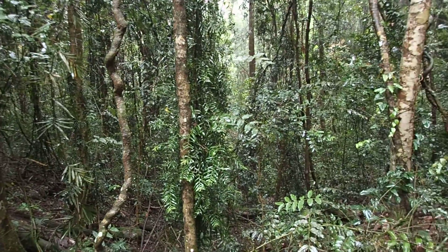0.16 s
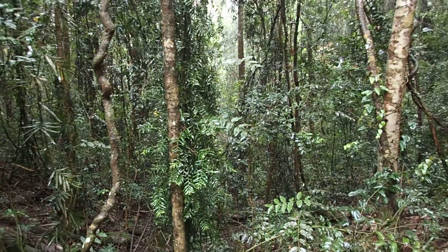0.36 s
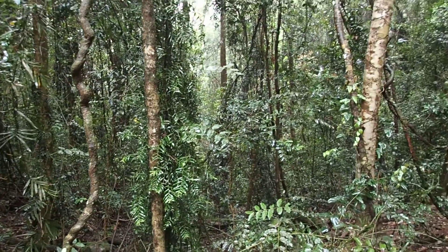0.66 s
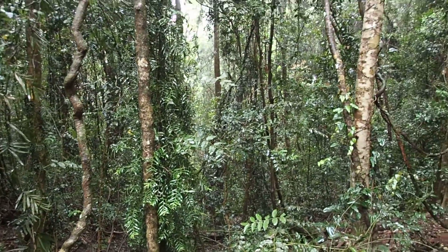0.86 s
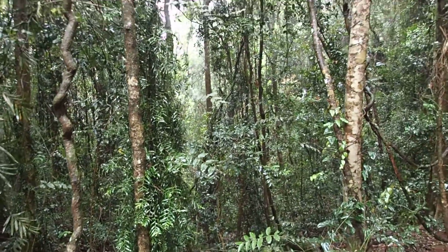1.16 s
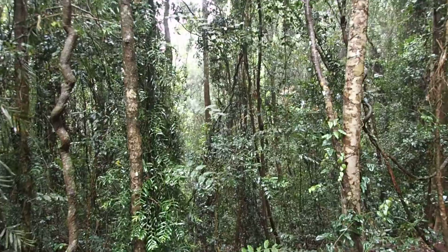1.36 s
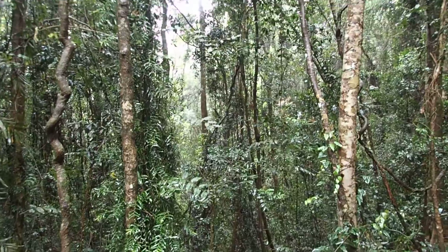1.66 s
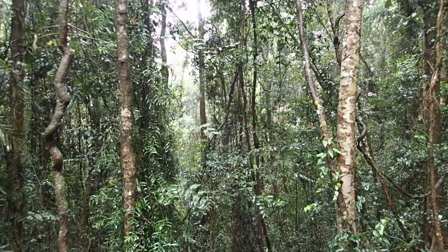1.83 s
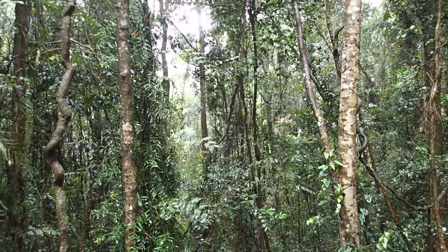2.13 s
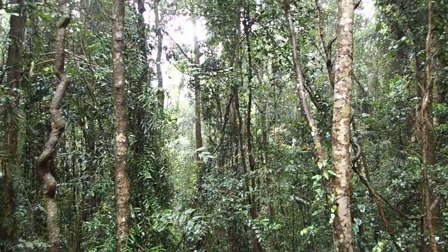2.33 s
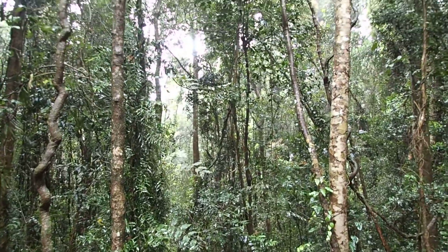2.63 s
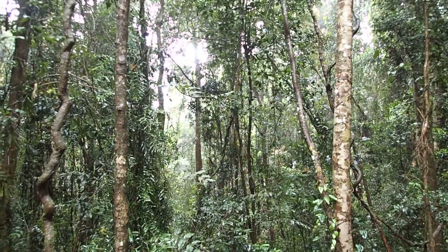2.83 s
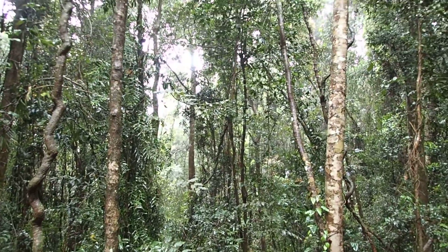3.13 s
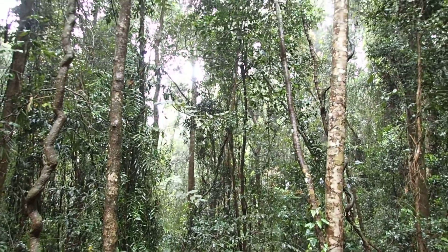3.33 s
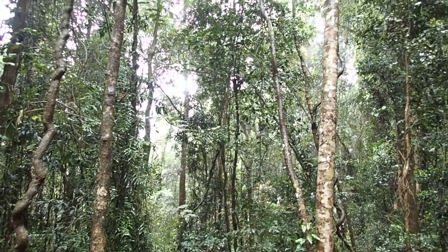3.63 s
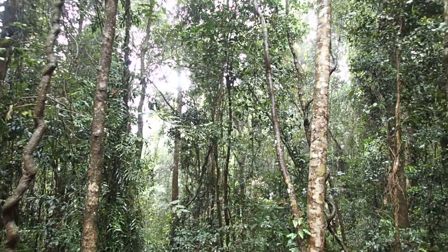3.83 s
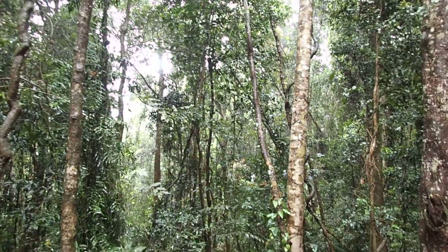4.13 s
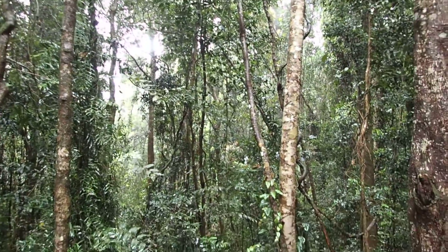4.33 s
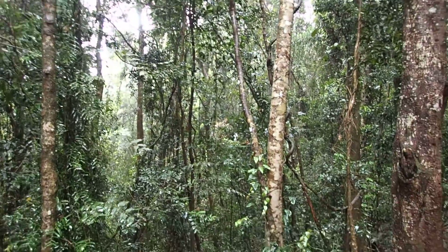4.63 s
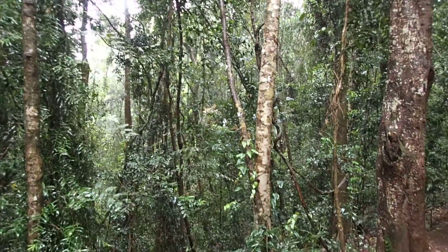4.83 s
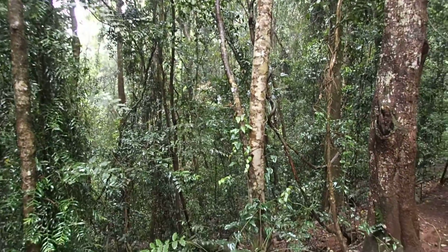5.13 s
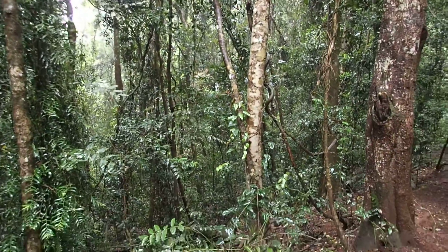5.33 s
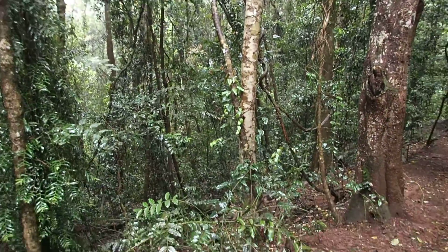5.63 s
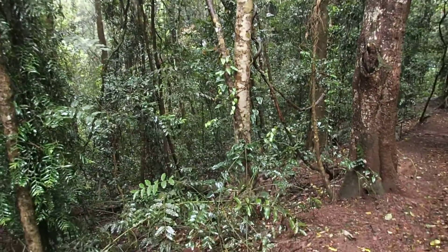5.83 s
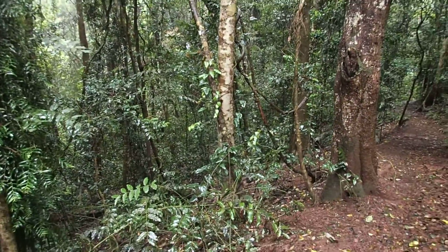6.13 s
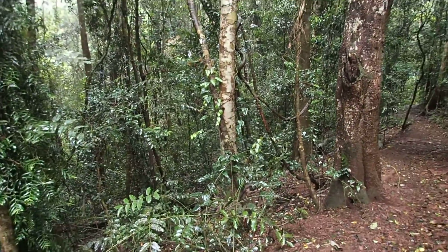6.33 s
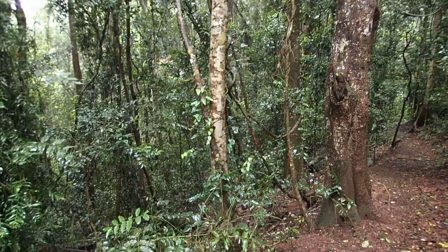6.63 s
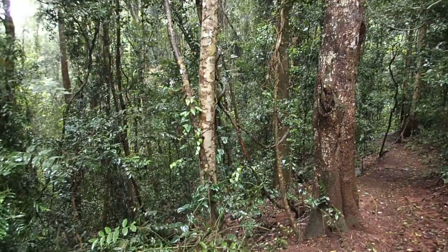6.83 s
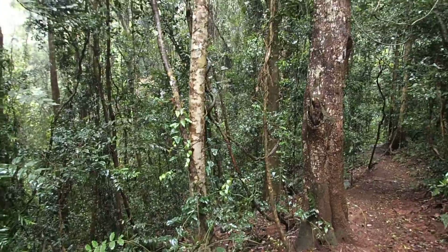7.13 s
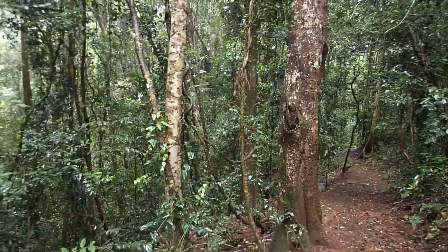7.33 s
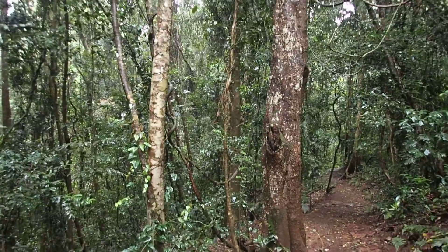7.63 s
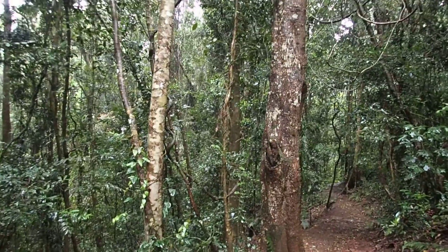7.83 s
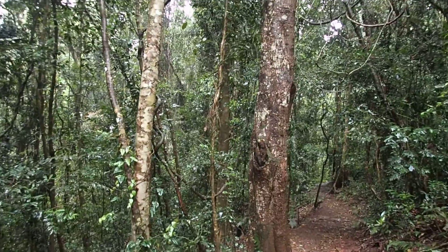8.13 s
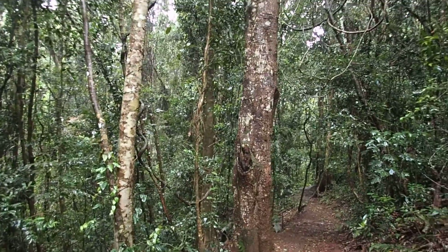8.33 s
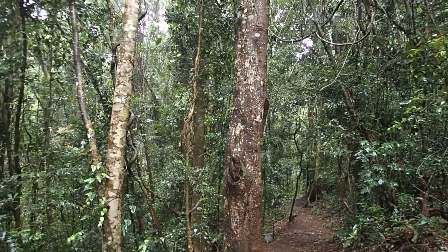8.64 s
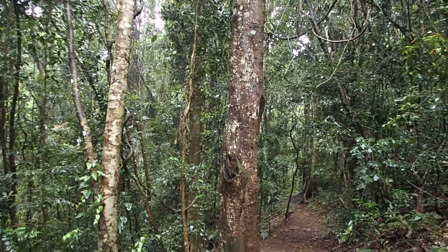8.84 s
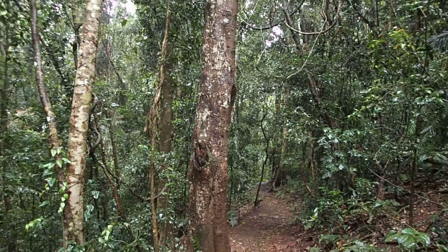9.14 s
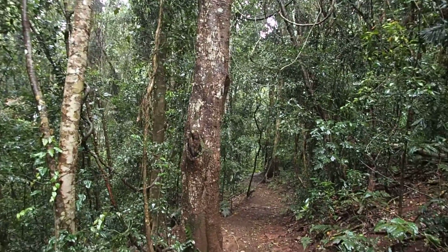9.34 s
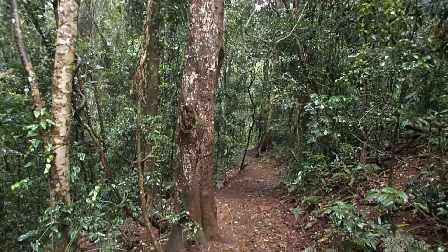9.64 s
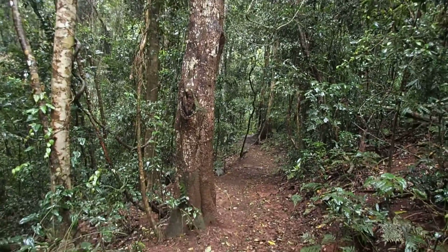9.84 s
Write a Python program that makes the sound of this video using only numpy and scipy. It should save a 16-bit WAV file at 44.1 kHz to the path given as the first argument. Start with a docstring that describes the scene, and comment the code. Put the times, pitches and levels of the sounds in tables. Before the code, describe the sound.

A damp rainforest with steady low rumble, airy hiss and irregular water drops pattering on foliage. A whipbird pipes a quick run of clear whistles, dips, and snaps into a rapid rising whip-crack with a ringing tail. Another bird's shrill, repeating rise-and-fall overlaps it and continues for several seconds, smeared by echoes. After quieter dripping, the whipbird calls once more. The small stereo microphone gives a slightly bright, resonant colour.

```python
"""Wet rainforest: throughout, forest noise hisses, drips burst on leaves, and a microphone colours it all.
From 2.5 s a whipbird gives short notes, rising then level, a falling note and a whip-crack sweep: bent sines.
From 3 s a small bird repeats a high two-note phrase that echoes off the trunks smear into a drone.
Near 5.2 s a faint chirp rises far off; from 7.8 s the whipbird calls again, its whip near 8.9 s."""
import sys
import numpy as np
from scipy import signal
from scipy.fft import rfft, irfft
from scipy.io import wavfile
from scipy.ndimage import uniform_filter1d

SR = 44100
rng = np.random.default_rng(int(sys.argv[2]) if len(sys.argv) > 2 else 0)


def log_audio(samples):
    """Write samples as a 16-bit WAV file to the path given in sys.argv[1]."""
    # one column per channel
    frames = np.atleast_2d(samples).T
    # limit to full scale, then quantise
    limited = np.clip(frames, -1, 1)
    pcm = np.round(limited * 32767).astype(np.int16)
    wavfile.write(sys.argv[1], SR, pcm)


N = 439677

# Source levels are ahead of echo and microphone.
# Spectrum of the forest hiss. Each row: frequency [Hz], relative density [dB].
FOREST_SPECTRUM = [(18, -28), (30, -3.5), (165, -1.5), (400, -7.5), (1240, -11.5), (2500, -13),
                   (6000, -14.5), (9000, -22), (16000, -24)]
# Nearest drips. Each row: start [s], peak level [dB], band centre [Hz], band half-width [octaves].
NEAR_DRIPS = [(0.281, -45, 8000, 1.1), (.324, -47, 6500, 0.45), (.55, -44, 5500, 0.77),
              (.664, -47.5, 980, 0.81), (.79, -46, 3000, 0.46), (1.111, -42, 5500, 0.83),
              (1.41, -48, 8000, 0.82), (1.776, -40.5, 1090, 0.71), (2.045, -47, 6000, 0.83),
              (2.841, -46, 5200, 0.51), (3.967, -40, 1210, 1.3), (4.009, -34.5, 7000, 1.7),
              (4.191, -34, 3500, 1.1), (4.456, -33, 3500, 0.9), (4.485, -40, 7300, 0.39),
              (4.83, -41, 2500, 1.21), (4.949, -41, 1300, 1.1), (5.304, -42, 13500, 0.37),
              (5.848, -42.5, 397, 0.61), (5.985, -49, 8000, 1.2), (6.28, -44, 2010, 1.17),
              (6.317, -37, 1300, 1.7), (6.46, -43, 2000, 1.2), (6.809, -40.5, 1100, 1.2),
              (6.973, -36.5, 1480, 1.8), (7.735, -53, 1990, 1.3), (7.84, -47, 1210, 1.3),
              (8.07, -41, 1500, 1.3), (8.426, -49, 8000, 1.2)]
# Small bird's rising note. Each row: time from phrase start [s], pitch ahead of scaling [Hz], relative level [dB].
RISING_NOTE = [(-.015, 4950, -8), (0, 5320, -2.5), (.017, 5762, 0.5), (.04, 5850, -5.5), (.08, 5800, -4)]
# Small bird's falling note. Each row: time from phrase start [s], pitch ahead of scaling [Hz], relative level [dB].
FALLING_NOTE = [(.08, 7370, -10), (.092, 6720, -10), (.105, 5995, -3), (.12, 5350, -1.5),
                (.135, 4900, -3.5), (0.151, 4550, -12)]
# Faint far call. Each row: time [s], pitch [Hz], level [dB].
FAR_CHIRP = [(5.19, 2750, -75), (5.23, 3130, -73), (5.29, 3720, -75)]
# Whipbird's short notes. Each row: start [s], start pitch [Hz], pitch at the hook's top [Hz],
# length [s], peak level [dB].
SHORT_NOTES = [(2.535, 2300, 2590, 0.047, -55.5), (2.647, 2136, 2560, 0.039, -47.5),
               (2.739, 2180, 2580, 0.052, -47.5), (2.841, 2114, 2520, 0.037, -45),
               (2.933, 2180, 2530, 0.043, -45.5), (3.035, 2250, 2343, 0.051, -42.5),
               (3.091, 2310, 2303, 0.045, -48), (3.17, 2298, 2297, 0.075, -36.5),
               (7.805, 2140, 2480, .04, -57), (7.985, 2220, 2480, .04, -56),
               (8.076, 2120, 2436, 0.058, -48), (8.173, 2222, 2430, 0.047, -45),
               (8.269, 2285, 2370, 0.044, -41.5), (8.348, 2333, 2357, 0.049, -38),
               (8.445, 2320, 2303, 0.044, -36.5), (8.493, 2282, 2314, 0.049, -39),
               (8.54, 2288, 2210, 0.067, -37)]
# Falling notes before the whips. Each row: start [s], length [s], pitch approached [Hz],
# level ahead of swell and fade [dB].
DROP_NOTES = [(3.315, 0.15, 1487, -45.5), (8.672, 0.12, 1545, -44.5)]
# Shape of the whip sweep. Each row: time from its start [s], pitch [Hz], relative level [dB].
WHIP_SHAPE = [(0, 1777, -21), (.015, 1754, -16), (.029, 1792, -12), (.044, 2380, -1.5), (.064, 3400, 2),
              (.084, 4700, -2.5), (.099, 6150, -0.8), (.113, 6990, -2), (0.125, 7270, -6),
              (.144, 7570, -30)]
# Whip sweeps. Each row: start [s], level added to the shape [dB].
WHIP_STARTS = [(3.555, -32.5), (8.897, -34)]
# Echo off the trunks round the whipbird, near ring then far ring. Each row: 60 dB decay time [s],
# energy against the direct sound ahead of scatter colour [dB].
WHIPBIRD_RINGS = [(.25, -5), (.9, 4)]
# Echo round the small bird, near ring then far ring. Each row: 60 dB decay time [s],
# energy against the direct sound ahead of build-up and scatter colour [dB].
SMALL_BIRD_RINGS = [(.4, 8.4), (1.0, 12.8)]
# Trunks and leaves scatter low notes less. Each row: frequency [Hz], echo gain [dB].
SCATTER_GAIN = [(1400, -11.5), (2300, -5.5), (4000, -4.5), (8000, -1.6)]
# Housing resonances and notches in the sound common to both ports. Each row: centre [Hz],
# full width at half the dB [Hz], gain [dB].
HOUSING_BELLS = [(1886, 114, -11.5), (2594, 570, -8), (3406, 75, -16), (4047, 517, -13), (4828, 81, -16.5),
                 (5135, 1410, 13.5), (7950, 1350, 7.5)]
# Pick-up of what differs between the ports. Each row: frequency [Hz], gain [dB].
PORT_GAP_GAIN = [(30, -8), (300, -4.5), (1000, -3.5), (2000, -10), (3400, -33), (4100, -40), (4600, 0.5),
                 (7700, 4), (9500, 1)]
# Excess of the left port over the right. Each row: frequency [Hz], difference [dB].
LEFT_EXCESS = [(100, 0.9), (500, 0.4), (2000, 1), (5000, 2.5), (15000, 1.1)]

FOREST_RMS_DB = -51  # ahead of the swells
RUMBLE_START_DB, RUMBLE_SLOPE_DB_PER_S = 0.55, -.13
PATTER_PER_S, PATTER_FLOOR_DB, PATTER_SPREAD_DB, PATTER_RANGE_DB = 90, -59, 3, 9
PHRASE_COUNT, PHRASE_START_S = 20, 2.96
PHRASE_GAP_S, HURRY_S, SETTLE_PHRASES = .235, .026, 4.0  # gaps start shorter, then settle
FIRST_PITCH_RATIO, SETTLED_PITCH_RATIO = 1.04, .972
RISE_DB, FALL_DB, PHRASE_SPREAD_DB = -58.5, -57.5, 2
FIRST_PHRASE_DB, LAST_PHRASE_DB = -3.5, -3.5  # added to those phrases
ECHO_BUILD_S = 0.005  # time constant
NOTE_PEAK_SHARE, NOTE_ARCH_DB, NOTE_HOOK_RAD = 0.39, 59, 1.72  # arch: fall one note length from the peak
DROP_FROM_HZ, DROP_GLIDE_S = 2010, .024
DROP_SOFT_DB, DROP_SWELL_S, DROP_FADE_DB_PER_S = -8, 0.042, 21
PREAMP_RMS_DB, TOP_HZ = -73.5, 15780  # preamp ahead of the top cut


def undb(db):
    """Amplitude ratio for a level in dB."""
    return 10 ** (np.asarray(db) / 20)


def level(x, db):
    """Scale to an rms level in dB."""
    return x * undb(db) / np.sqrt(np.mean(x ** 2))


def on_log(table):
    """(Hz, dB) points as a function of frequency, straight on a log axis."""
    hz, db = np.transpose(table)
    return lambda f: np.interp(np.log(f + 1), np.log(hz), db)


def colour(x, db_at, size=4096):
    """Causal minimum-phase filter with the given dB gain, from the folded cepstrum."""
    freq_hz = np.arange(size // 2 + 1) * SR / size
    cepstrum = irfft(np.log(undb(db_at(freq_hz))))
    cepstrum[1:size // 2] *= 2
    cepstrum[size // 2 + 1:] = 0
    impulse = irfft(np.exp(rfft(cepstrum)))
    return signal.fftconvolve(x, np.atleast_2d(impulse), axes=1)[:, :x.shape[1]]


def walk(rate_hz):
    """Random levels held 1 / rate_hz and slewed twice; standard deviation 1."""
    k = int(SR / rate_hz)
    held = np.repeat(rng.standard_normal(N // k + 1), k)
    x = uniform_filter1d(uniform_filter1d(held, k), k)[:N]
    return x / x.std()


def add(out, piece, start_s):
    """Mix a piece into out, cut at its end."""
    i = int(start_s * SR)
    out[i:i + len(piece)] += piece[:len(out) - i]


def sing(notes, edge_s, flutter_db, waver, overtone_db):
    """A near sine per note with an octave overtone and soft ends; level and pitch flutter quickly."""
    out, shake, drift = np.zeros(N), walk(300), walk(200)
    for note in notes:
        time_s, pitch_hz, note_db = np.transpose(note)
        t = np.arange(time_s[0], time_s[-1], 1 / SR)
        i = (t * SR).astype(int)
        pitch = np.interp(t, time_s, pitch_hz) * (1 + waver * drift[i])
        phase = 2 * np.pi * np.cumsum(pitch) / SR
        tone = np.sin(phase) + undb(overtone_db) * np.sin(2 * phase)
        ends = np.clip(np.minimum(t - time_s[0], time_s[-1] - t) / edge_s, 0, 1)
        gain = np.sqrt(2) * undb(np.interp(t, time_s, note_db) + flutter_db * shake[i])
        add(out, gain * ends * tone, time_s[0])
    return out


def among_trunks(x, rings, width, build_s=1e-4):
    """Direct sound plus decaying noise echoes; width scales the echo that differs between left and right."""
    t = np.arange(int(1.5 * SR)) / SR
    envelope = np.zeros(len(t))
    for t60_s, db in rings:
        unit_energy = np.sqrt(2 * np.log(1000) / t60_s / SR)
        envelope += undb(db) * unit_energy * 1000 ** (-t / t60_s)
    envelope *= 1 - np.exp(-t / build_s)
    mid, side = colour(rng.standard_normal((2, len(t))) * envelope, on_log(SCATTER_GAIN))
    mid[0] = 1  # direct sound
    responses = np.array([mid + width * side, mid - width * side])
    return signal.fftconvolve(x[None], responses, axes=1)[:, :N]


def forest():
    """Diffuse noise, unrelated left and right; bass and treble swell apart while the bass eases off."""
    hiss = level(colour(rng.standard_normal((2, N)), on_log(FOREST_SPECTRUM)), FOREST_RMS_DB)
    low = signal.sosfilt(signal.butter(1, 500, fs=SR, output="sos"), hiss)
    rumble_db = RUMBLE_START_DB + RUMBLE_SLOPE_DB_PER_S * np.arange(N) / SR
    return low * undb(rumble_db + 0.39 * walk(4.4)) + (hiss - low) * undb(0.83 * walk(5))


def drips(decay_s=0.00068, size=1024):
    """Each drop on a leaf is a short noise burst in its own band; many faint ones fall at random."""
    faint = []
    for a, b, c, d in rng.random((int(PATTER_PER_S * N / SR), 4)):
        excess_db = min(-PATTER_SPREAD_DB * np.log(1 - b), PATTER_RANGE_DB)
        faint.append((a * N / SR, PATTER_FLOOR_DB + excess_db, 500 * 2 ** (4.5 * c), .5 + d))
    out, freq_hz = np.zeros(N), np.arange(1, size // 2 + 2) * SR / size
    for start_s, peak_db, centre_hz, octaves in NEAR_DRIPS + faint:
        band_gain = np.exp(-(np.log2(freq_hz / centre_hz) / octaves) ** 2)
        band = irfft(rfft(rng.standard_normal(size)) * band_gain)
        # low drops ring longer
        u = np.arange(size) / SR / (decay_s + 2.04 / centre_hz)
        burst = band * u * np.exp(-u)
        add(out, burst * undb(peak_db) / np.abs(burst).max(), start_s)
    return out


def far_chirp():
    """One faint rising near sine with strong flutter."""
    return sing([FAR_CHIRP], edge_s=.008, flutter_db=4.5, waver=.012, overtone_db=-50)


def small_bird():
    """Repeated rise and fall, slowing and sinking to a steady state; the last phrase ends after its rise."""
    k = np.arange(PHRASE_COUNT)
    fresh = np.exp(-k / SETTLE_PHRASES)
    gaps_s = PHRASE_GAP_S - HURRY_S * fresh
    starts_s = PHRASE_START_S + np.cumsum(gaps_s) - gaps_s
    ratios = SETTLED_PITCH_RATIO + (FIRST_PITCH_RATIO - SETTLED_PITCH_RATIO) * fresh
    ends_db = FIRST_PHRASE_DB * (k == k[0]) + LAST_PHRASE_DB * (k == k[-1])
    scatter_db = PHRASE_SPREAD_DB * rng.standard_normal((PHRASE_COUNT, 2))
    levels_db = [RISE_DB, FALL_DB] + ends_db[:, None] + scatter_db
    notes = []
    for start_s, ratio, pair_db in zip(starts_s, ratios, levels_db):
        for shape, db in zip((RISING_NOTE, FALLING_NOTE), pair_db):
            notes.append(np.array(shape) * [1, ratio, 1] + [start_s, 0, db])
    return sing(notes[:-1], edge_s=.005, flutter_db=2.2, waver=.005, overtone_db=-50)


def whipbird():
    """Near sines: short notes that hook over, a note that drops and holds, then the whip sweep."""
    u = np.linspace(0, 1, num=17)  # share of the note
    notes = []
    for start_s, start_hz, top_hz, length_s, db in SHORT_NOTES:
        pitch_hz = start_hz + (top_hz - start_hz) * np.sin(NOTE_HOOK_RAD * u)
        arch_db = db - NOTE_ARCH_DB * (u - NOTE_PEAK_SHARE) ** 2
        notes.append(np.transpose([start_s + u * length_s, pitch_hz, arch_db]))
    for start_s, length_s, end_hz, db in DROP_NOTES:
        t = u * length_s
        pitch_hz = end_hz + (DROP_FROM_HZ - end_hz) * np.exp(-t / DROP_GLIDE_S)
        drop_db = db + DROP_SOFT_DB * np.exp(-t / DROP_SWELL_S) - DROP_FADE_DB_PER_S * t
        notes.append(np.transpose([start_s + t, pitch_hz, drop_db]))
    for start_s, db in WHIP_STARTS:
        notes.append(np.array(WHIP_SHAPE) + [start_s, 0, db])
    return sing(notes, edge_s=.003, flutter_db=.6, waver=.0008, overtone_db=-29)


def scene():
    """Sum of the forest and the sources, each with its echo off the trunks."""
    far_birds = small_bird() + far_chirp()
    near_drips = among_trunks(drips(), [(.3, -7)], width=.7)  # one ring: 60 dB decay s, dB
    near_bird = among_trunks(whipbird(), WHIPBIRD_RINGS, width=0.53)
    far_birds = among_trunks(far_birds, SMALL_BIRD_RINGS, width=0.73, build_s=ECHO_BUILD_S)
    return near_bird + far_birds + near_drips + forest()


def housing_db(freq_hz):
    """Gain of the housing: a sum of resonance bells in dB."""
    return sum(db / (1 + (2 * (freq_hz - hz) / width_hz) ** 2) for hz, width_hz, db in HOUSING_BELLS)


def record(dry):
    """Housing colours the common sound, the left port is louder, the preamp hisses, the top is cut."""
    mid = colour(dry[:1] + dry[1:], housing_db)
    side = colour(dry[:1] - dry[1:], on_log(PORT_GAP_GAIN))
    lean_db = on_log(LEFT_EXCESS)
    left = colour(mid + side, lambda f: lean_db(f) / 2)
    right = colour(mid - side, lambda f: -lean_db(f) / 2)
    preamp = undb(PREAMP_RMS_DB) * rng.standard_normal(dry.shape)
    out = np.vstack([left, right]) / 2 + preamp
    return signal.sosfilt(signal.ellip(12, .2, 70, TOP_HZ, fs=SR, output="sos"), out)


dry = scene()
out = record(dry)
log_audio(out)
```